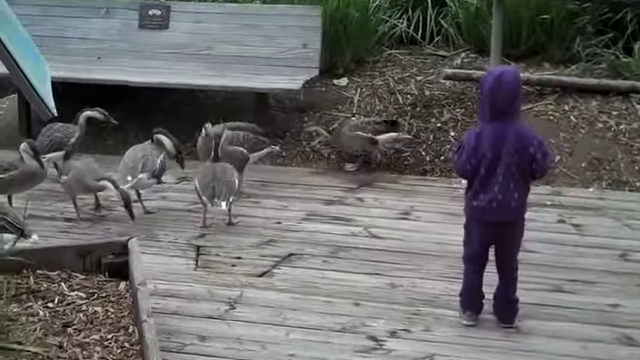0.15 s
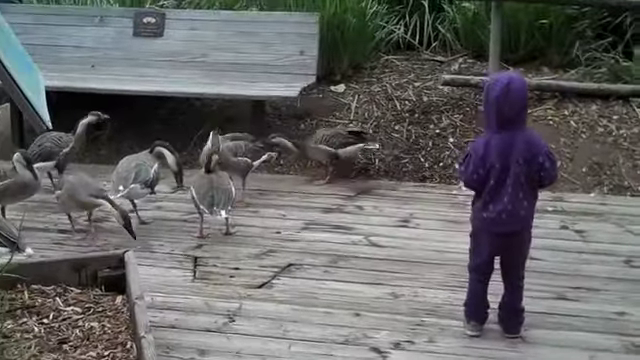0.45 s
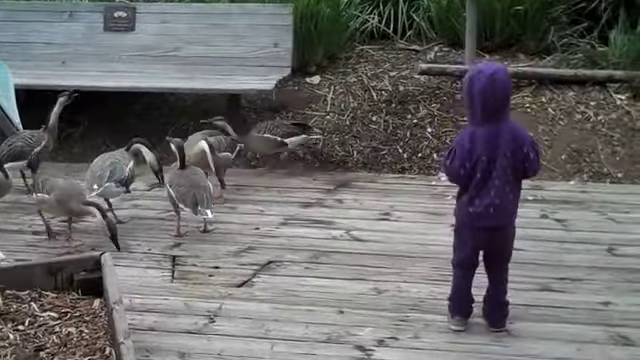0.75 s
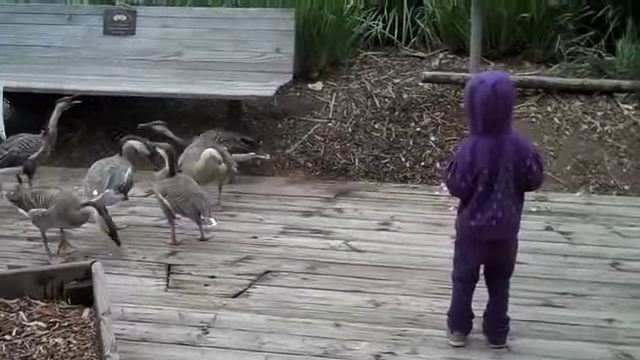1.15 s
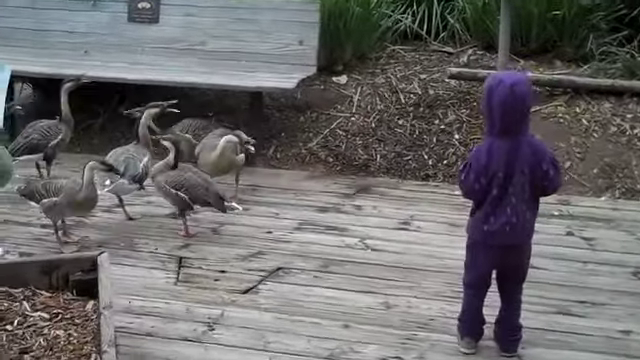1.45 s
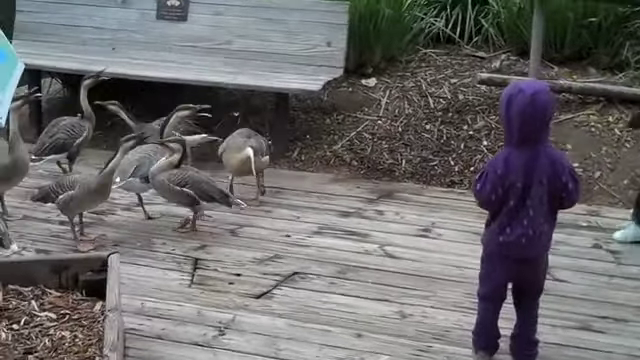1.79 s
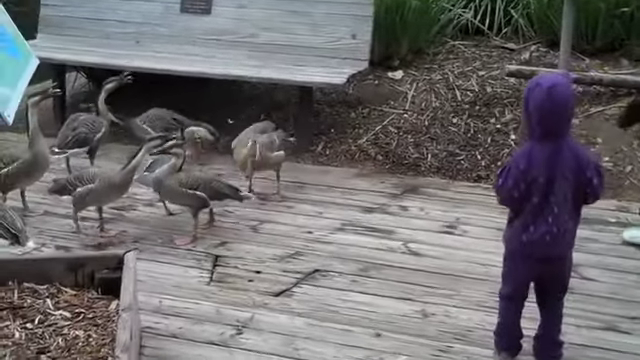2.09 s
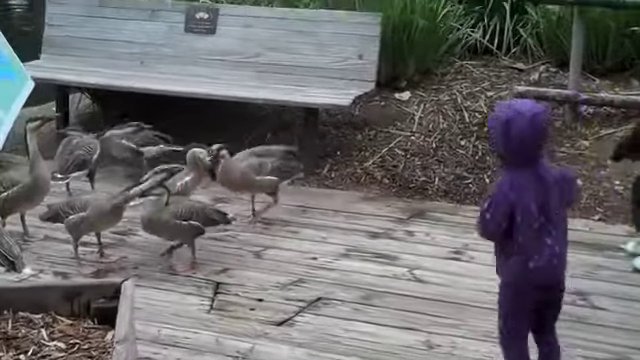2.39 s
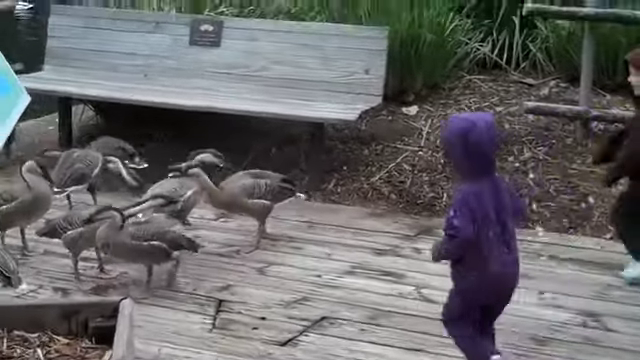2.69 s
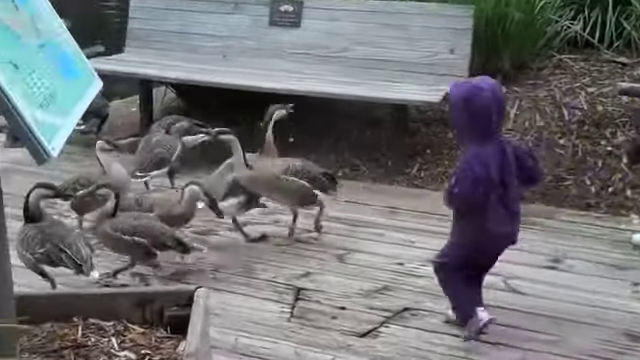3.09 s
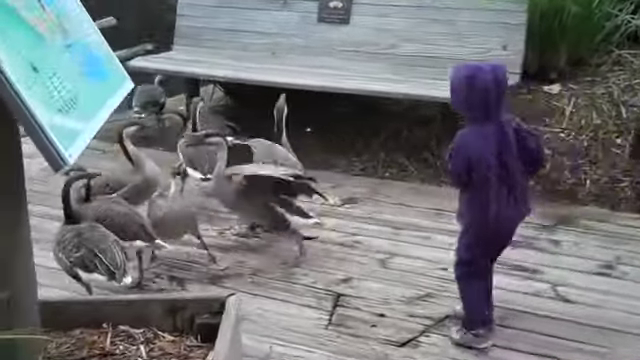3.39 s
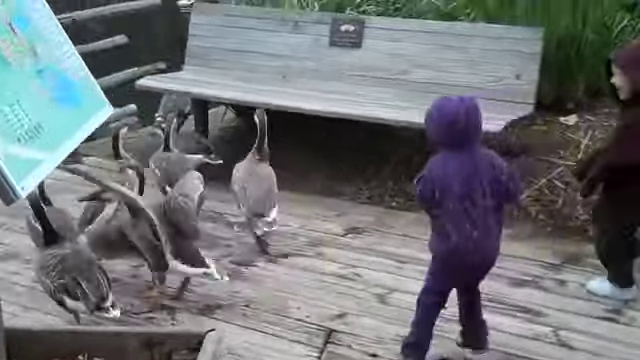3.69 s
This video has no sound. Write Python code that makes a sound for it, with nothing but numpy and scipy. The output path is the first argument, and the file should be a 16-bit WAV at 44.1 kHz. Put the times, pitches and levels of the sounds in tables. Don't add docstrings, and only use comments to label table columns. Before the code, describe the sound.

Geese honking and chattering together nonstop a few metres away, with faint knocks on deck boards.

```python
import sys
import numpy as np
from scipy import signal
from scipy.fft import rfft, irfft, next_fast_len
from scipy.io import wavfile
from scipy.ndimage import uniform_filter1d

SR = 44100
rng = np.random.default_rng(int(sys.argv[2]) if len(sys.argv) > 2 else 0)


def digitize_waveform(pressure):
    field = np.atleast_2d(pressure).T
    bounded = np.clip(field, -1, 1)
    quanta = np.round(bounded * 32767).astype(np.int16)
    wavfile.write(sys.argv[1], SR, quanta)


def voltage_ratio(decibels):
    exponent = np.asarray(decibels, float) / 20
    return 10 ** exponent


N = 169785
RATTLE = .65


def evened(x):
    return x / np.sqrt(np.mean(x ** 2) + 1e-20)


def add(mix, s, sound):
    at = round(s * SR)
    part = mix[max(at, 0):][:len(sound) + min(at, 0)]
    part += sound[max(-at, 0):][:len(part)]


def colour(x, points):
    f, db = np.transpose(points)
    size = next_fast_len(len(x))
    hz = np.fft.rfftfreq(size, 1 / SR)
    gain_db = np.interp(np.log(hz + 1), np.log(f), db, -90, -90)
    return irfft(rfft(x, size) * voltage_ratio(gain_db), size)[:len(x)]


def resonate(x, hz, width):
    turn = np.exp(2j * np.pi * np.cumsum(hz + 0 * x) / SR)
    r = np.exp(-np.pi * width / SR)
    return 2 * (turn * signal.lfilter([1 - r], [1, -r], x / turn)).real


def drift(count, span_s):
    wide = max(int(span_s * SR), 2)
    return evened(uniform_filter1d(uniform_filter1d(rng.standard_normal(count), wide), wide))


def windpipe(drive, hz, levels_db, narrow=1):
    rings = []
    for k in range(len(levels_db)):
        width_hz = narrow * (235 + 64.6 * k)
        once = resonate(drive, hz * (k + 1), width_hz)
        rings.append(evened(resonate(once, hz * (k + 1), width_hz)))
    return evened(voltage_ratio(np.array(levels_db)) @ rings)


def syllable(rasp, neck, centre, length, effort_db, bright_db, pipe_hz, mate):
    pipe_db = [-7, 3.5, -5, -4.5, -10]
    # frequency in Hz, level in dB per Hz.
    rasp_colour = [(450, -44), (680, -14), (2000, -3), (4500, -7), (7200, -19.5), (8800, -36)]
    half = min(1.2 * length, .16)
    t = np.arange(-half, half, 1 / SR)
    at = (np.arange(len(t)) + round((centre - half) * SR)) % N
    drive, other = rasp[at], rasp[at - SR]
    order = np.arange(len(pipe_db))
    voice = windpipe(drive, pipe_hz * neck[at], pipe_db + bright_db * (order > 1))
    mate_hz = (730 + mate ** 2 * (1300 - 730)) * neck[at - SR]
    voice = voice + voltage_ratio(-9) * windpipe(other, mate_hz, -4.5 * order)
    voice = voice + voltage_ratio(-3 + 0.57 * bright_db) * evened(colour(drive - other, rasp_colour))
    swell_db = -5.23 * abs(2 * t / length) ** 2.4
    return centre + t[0], voltage_ratio(-1.5 + effort_db + swell_db) * evened(voice)


def grunt(rasp, start, peak_db, pipe_hz, length):
    t = np.arange(0, .13, 1 / SR)
    drive = rasp[(np.arange(len(t)) + round(start * SR) + SR // 2) % N]
    sinking_hz = pipe_hz * (1 - 0.26 * (t - length / 2))
    voice = windpipe(drive, sinking_hz, -5 * np.arange(3), 0.61)
    fade_db = -4.84 * (t / length) ** 2
    return start - .008, voltage_ratio(-9 + peak_db + fade_db) * np.minimum(t / 0.011, 1) * voice


def gabble():
    # centre in seconds, length in seconds, effort in dB,
    # brightness in dB, windpipe pitch in Hz.
    harsh_rows = [(0.089, 0.16, -34, 9.5, 1124), (0.194, 0.05, -26, -7, 1092), (0.265, 0.048, -31, -47, 1100),
                  (0.327, 0.06, -32.5, 2, 978), (0.446, 0.082, -26, 0, 1055), (0.557, 0.058, -26.5, 1, 992),
                  (0.66, 0.075, -31, 2.5, 1050), (0.713, 0.04, -34.5, 14, 1080), (0.775, 0.1, -31.5, 7, 1006),
                  (0.844, 0.04, -25.5, -4.5, 1048), (0.986, 0.031, -29.5, 2, 1106),
                  (1.054, 0.063, -29.5, 3, 1003), (1.113, 0.041, -30, 4.5, 1140), (1.18, 0.042, -29, -3.5, 1150),
                  (1.246, 0.036, -32, -7, 1058), (1.317, 0.029, -32, 4.5, 786), (1.39, 0.047, -31.5, 1, 1043),
                  (1.438, 0.033, -26.5, -2, 1166), (1.496, 0.13, -34.5, 4.2, 1160),
                  (1.551, 0.051, -28, -1, 1037), (1.65, 0.091, -31, 3.5, 974), (1.723, 0.11, -28, -5, 1100),
                  (1.8, 0.036, -20.5, 8, 936), (1.94, 0.13, -26.5, 0.7, 1040), (2.06, 0.06, -30, 0, 1075),
            (2.173, 0.062, -30, 5.5, 905), (2.279, 0.069, -26, -1, 1140), (2.42, 0.13, -32, 2, 1056),
            (2.508, 0.031, -22, 1, 1080), (2.574, 0.052, -34, 3.5, 1030), (2.642, 0.044, -29, 1.5, 1100),
            (2.716, 0.045, -28, 2, 1085), (2.781, 0.057, -28, 7, 1084), (2.84, 0.042, -30, -18, 995),
            (2.889, 0.077, -31.5, -3, 830), (2.997, 0.022, -30.5, 10, 1098), (3.03, 0.04, -31, 3, 1080),
            (3.105, 0.063, -27, 10.5, 960), (3.173, 0.057, -32.5, 9, 1050), (3.249, 0.12, -26.5, 5.5, 1150),
            (3.348, 0.13, -33, -17, 916), (3.454, 0.041, -31, 5, 970), (3.539, 0.086, -30, 19, 1145),
            (3.663, 0.064, -34, -8.5, 1038), (3.816, 0.037, -38, -33, 1130)]
    # start in seconds, peak in dB, windpipe pitch in Hz,
    # length in seconds.
    low_grunts = [(0.117, -24.5, 1226, 0.034), (0.391, -30.5, 830, 0.054), (0.49, -28.5, 1040, 0.018),
                  (0.552, -23.5, 1139, 0.04), (0.646, -28, 725, 0.061), (0.693, -28.5, 963, 0.057),
                  (0.82, -26, 1036, 0.06), (1.04, -27.5, 1356, 0.073), (1.108, -23.5, 985, 0.034),
                  (1.166, -26.5, 740, 0.031), (1.41, -22, 863, 0.045), (1.523, -23.5, 739, 0.059),
                  (1.612, -22.5, 867, 0.058), (1.669, -27, 977, 0.038), (1.744, -29.5, 1120, 0.05),
                  (1.776, -30, 1610, 0.065), (1.872, -26, 1106, 0.06), (2.118, -27, 1590, 0.039),
                  (2.273, -21.5, 1310, 0.044), (2.366, -28.5, 822, 0.039), (2.502, -22.5, 1307, 0.045),
                  (2.694, -29.5, 1084, 0.049), (2.756, -25, 1033, 0.038), (2.829, -25, 1360, 0.033),
                  (2.878, -28.5, 1182, 0.028), (2.988, -31.5, 953, 0.045), (3.096, -26.5, 1073, 0.05),
                  (3.164, -24, 872, 0.045), (3.248, -31.5, 802, 0.039), (3.516, -37, 723, 0.089),
                  (3.641, -26, 1095, 0.051), (3.796, -30, 1100, 0.069)]
    pulses_per_s, breath_share = 180, .38
    turns = np.cumsum(pulses_per_s * np.exp(.2 * drift(N, .004))) / SR
    sizes = voltage_ratio(2 * rng.standard_normal(N))[turns.astype(int)]
    pulses = sizes * np.diff(np.floor(turns), prepend=0)
    puffs = sizes * (.5 + np.exp(-(turns % 1) / .5)) * rng.standard_normal(N)
    rasp = (1 - breath_share) * evened(pulses) + breath_share * evened(puffs)
    neck = 1 + .035 * drift(N, 0.017)
    rows, out = harsh_rows, np.zeros(N)
    for row, mate in zip(rows, rng.random(len(rows))):
        add(out, *syllable(rasp, neck, *row, mate))
    for row in low_grunts:
        add(out, *grunt(rasp, *row))
    return out


def call(start, length, level_db, pitch_hz, stack_db, rattle, slide=0):
    t = np.arange(-.03, .18, 1 / SR)
    along = np.clip(t / length, 0, 1.3)
    bend = .025 * (1 - rattle * rng.uniform(0, 5))
    wobble = .006 * (1 + 3 * rattle) * drift(len(t), 0.0086)
    hz = pitch_hz * (1 + (slide or bend) * (along - .5) + wobble)
    phase = 2 * np.pi * np.cumsum(hz) / SR
    voice = 0
    for k, db in enumerate(stack_db):
        flutter_db = 3.5 * np.tanh(drift(len(t), .005))
        voice = voice + voltage_ratio(db + flutter_db) * np.cos((k + 1) * phase)
    rattle_hz = 190 * (1 + .25 * drift(len(t), .005))
    beats = 1 + rattle * np.cos(2 * np.pi * np.cumsum(rattle_hz) / SR)
    edge_s = .008
    shape = (np.tanh(2 * t / edge_s) - np.tanh(2 * (t - length) / edge_s)) / 2
    sag_db = -7 * rattle * along ** 2
    return start + t[0], np.sqrt(2) * voltage_ratio(level_db + 1 + sag_db) * shape * beats * voice


def honks():
    # start in seconds, length in seconds, level in dB, pitch in Hz, brightness in dB.
    honk_rows = [(0.48, 0.014, -41, 1002, 8), (0.761, 0.079, -40.5, 1032, 8), (1.99, 0.05, -36, 790, 0),
                 (2.04, 0.04, -33, 815, 0), (0.969, 0.02, -45, 958, 7), (1.3, 0.059, -39, 851, 8),
                 (1.64, 0.26, -37, 1015, 2), (1.78, 0.028, -20.5, 1011, -9), (1.87, 0.1, -32.5, 1060, 2),
                 (2.027, 0.021, -19.5, 1036, 5), (2.13, 0.012, -31, 807, 6), (2.161, 0.034, -36, 1024, 8),
                 (2.26, 0.044, -28, 1117, 3.5), (2.38, 0.053, -32.5, 1029, 6),
                 (2.496, 0.051, -30, 1139, 2.5), (2.63, 0.015, -30, 1156, -10), (2.7, 0.04, -36, 1085, 0),
                 (2.76, 0.026, -33.5, 987, 7.5), (3.575, 0.025, -32, 833, 0),
                 (3.647, 0.028, -30, 1060, -12)]
    open_beak_db = [-15, -1.5, -14, -10, -18, -28, -36]
    # start in seconds, length in seconds, level in dB, pitch in Hz.
    pure_honk = (3.521, .06, -29, 1123)
    pure_stack_db = [-17, -1, -6, -9, -4, -18, -22]
    out = np.zeros(N)
    add(out, *call(*pure_honk, pure_stack_db, .05, .025))
    upper = np.arange(len(open_beak_db)) > 1
    for *row, bright_db in honk_rows:
        rattle = RATTLE * np.clip(1 - bright_db / 30, .5, 1)
        add(out, *call(*row, open_beak_db + min(bright_db, 8.) * upper, rattle))
    return out


def hoots():
    # start in seconds, length in seconds, level in dB, pitch in Hz.
    hoot_rows = [(0.03, 0.032, -49, 1001), (0.12, 0.039, -39, 1202), (0.18, 0.051, -53, 740),
                 (0.29, 0.048, -51.5, 790), (0.36, 0.07, -47.5, 775), (0.549, 0.022, -45, 1130),
                 (0.64, 0.024, -45.5, 729), (0.681, 0.041, -50.5, 990), (0.82, 0.048, -47, 1263),
                 (1.03, 0.034, -45, 862), (1.11, 0.034, -48.5, 993), (1.34, 0.12, -47, 741),
                 (1.41, 0.041, -43, 950), (1.48, 0.016, -38, 1270), (1.53, 0.023, -43.5, 798.5),
                 (1.62, 0.047, -43, 888), (2.23, 0.089, -55.5, 700), (2.509, 0.025, -37, 1300),
                 (2.869, 0.037, -45, 1210), (3.27, 0.049, -45, 820), (3.36, 0.03, -49, 701),
                 (3.606, 0.021, -43.5, 1268), (3.665, 0.022, -46, 1240)]
    shut_beak_db = [6, -1.5, -3, -8, -17.5]
    # start in seconds, length in seconds, level in dB, first and last pitch in Hz.
    sliding = [
        (3.172, .055, -38, 895, 830),
        (3.718, .068, -48, 870, 975),
        (3.79, .055, -48, 1060, 1130),
        (2.628, .045, -51, 730, 700),
        (2.7, .05, -52, 650, 660),
    ]
    out = np.zeros(N)
    for *row, first_hz, last_hz in sliding:
        slide = np.log(last_hz / first_hz)
        add(out, *call(*row, (first_hz + last_hz) / 2, [3, -14, -22], RATTLE / 3, slide))
    for row in hoot_rows:
        add(out, *call(*row, shut_beak_db, RATTLE / 3))
    return out


def steps():
    # time in seconds, level in dB, pitch of the board in Hz.
    footfalls = [(0.414, -54.5, 186), (1.126, -49.5, 226), (1.425, -54, 129), (2.347, -53.5, 150),
                 (2.845, -59, 131), (3.529, -55, 151), (0.563, -44, 453), (2.594, -42, 300),
                 (3.031, -50.5, 224), (3.238, -46, 360), (3.39, -49, 234)]
    out, t = np.zeros(N), np.arange(0, .2, 1 / SR)
    ring_s, boom_hz = 0.078, 104
    onset = np.sin(np.pi / 2 * np.minimum(t / 0.0088, 1)) ** 2
    for s, db, hz in footfalls:
        puff = resonate(rng.standard_normal(len(t)), hz, 0.57 * hz)
        puff = evened(resonate(puff, hz, 0.57 * hz))
        boom = boom_hz / hz * np.sin(2 * np.pi * boom_hz * t)
        thud = np.sin(2 * np.pi * hz * t) + voltage_ratio(8) * puff + boom
        add(out, s, voltage_ratio(db - 60 * t / ring_s) * onset * thud)
    return out


def yard(x):
    t = np.arange(int(.4 * SR)) / SR
    signs = rng.choice([-1., 1.], len(t))
    taps = signs * (rng.random(len(t)) < .04) * (t > .004) * voltage_ratio(-60 * t / .12)
    return signal.fftconvolve(x, taps / np.linalg.norm(taps))[:N]


def park():
    # frequency in Hz, level in dB per Hz.
    hum_colour = [(25, -23.5), (60, -36), (195, -9.5), (270, -15), (480, -13.5), (700, -1)]
    # frequency in Hz, level in dB per Hz.
    far_colour = [(420, -41), (800, -9.5), (2500, -9.5), (4500, -18.5), (7000, -33), (9000, -63)]
    # centre in seconds, length in seconds, change in dB.
    lulls = [
        (.925, .08, -7),
        (2.11, .04, -4),
        (2.35, .03, -4),
        (2.965, .04, -5),
        (3.49, .03, -4),
        (3.75, .1, -6),
    ]
    t = np.arange(N) / SR
    lull_db = sum(db * np.exp(-(2 * (t - s) / length) ** 4) for s, length, db in lulls)
    hum = evened(colour(rng.standard_normal(N), hum_colour))
    hum = hum * voltage_ratio(-53.5 + 2.6 * drift(N, 0.013))
    far = evened(colour(rng.standard_normal(N), far_colour))
    return hum + far * voltage_ratio(-40 + lull_db + 1.2 * drift(N, 0.13))


def scene():
    geese = gabble() + honks() + hoots()
    return (geese + voltage_ratio(-11) * yard(geese) + steps() + park())[None]


def low_pass(x):
    return signal.sosfilt(signal.butter(12, 9030, fs=SR, output="sos"), x)


def record(dry):
    power = abs(uniform_filter1d(dry ** 2, SR // 2, origin=SR // 6))
    power_db = 10 * np.log10(power + 1e-12)
    held = dry / voltage_ratio(0.16 * np.maximum(power_db + 27.5, 0))
    ceiling = .42
    held = ceiling * np.tanh(held / ceiling)
    keep = np.exp(-1 / (.08 * SR))
    shifted = held - .0004 - 40 * signal.lfilter([1 - keep], [1, -keep], held ** 4)
    cut = signal.oaconvolve(shifted, signal.firwin(255, 8540, fs=SR)[None], "same")
    return low_pass(cut)


dry = scene()
out = record(dry)
digitize_waveform(out)
```